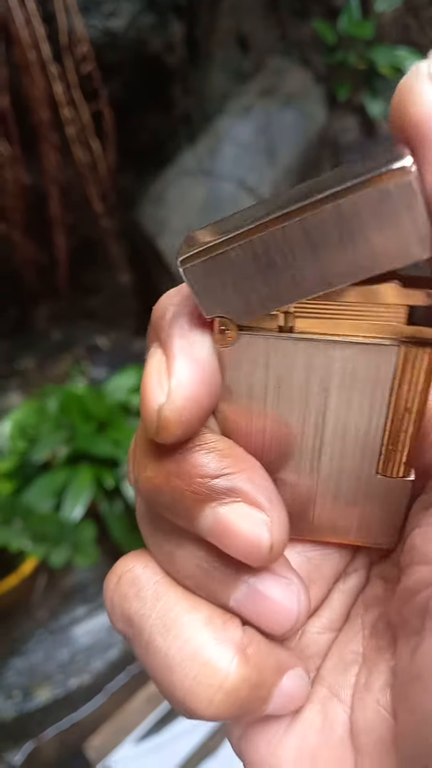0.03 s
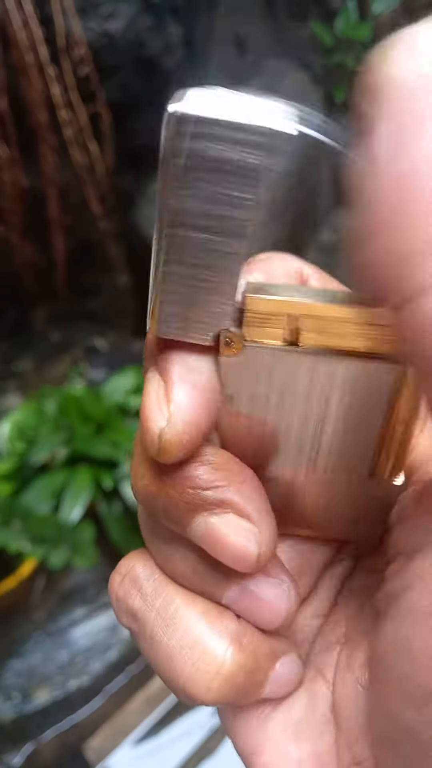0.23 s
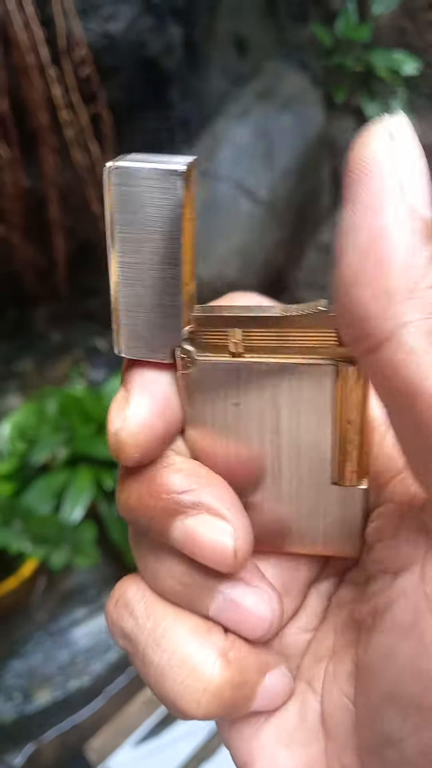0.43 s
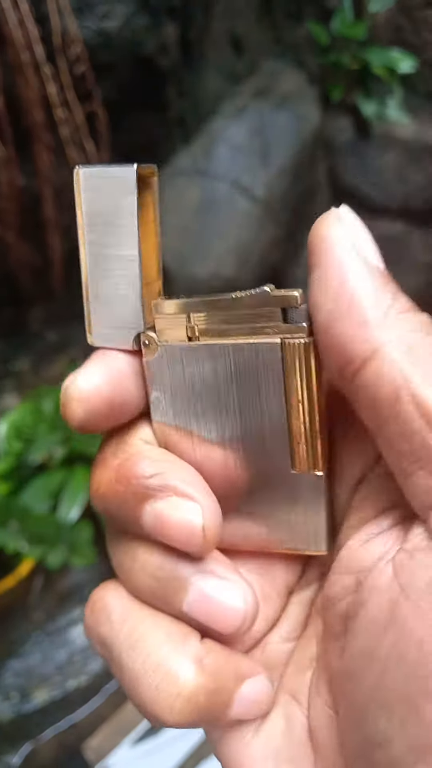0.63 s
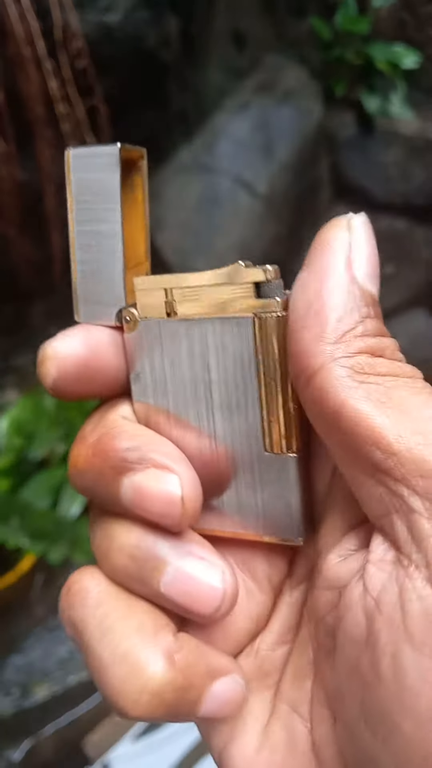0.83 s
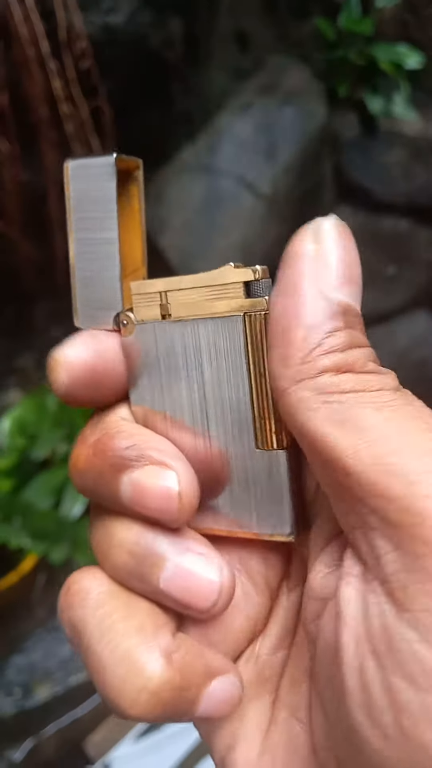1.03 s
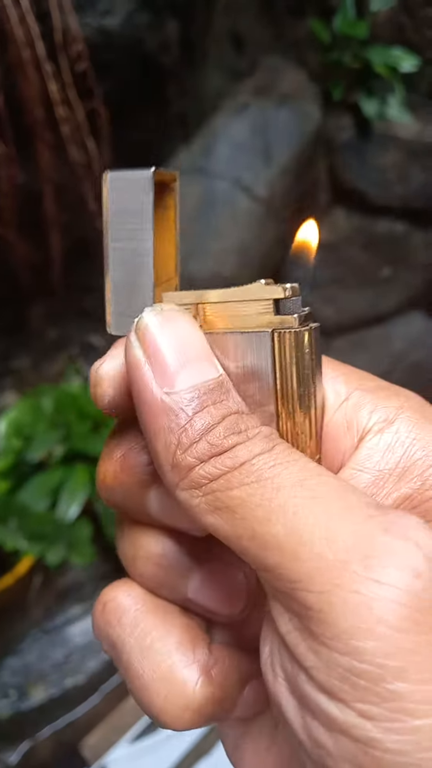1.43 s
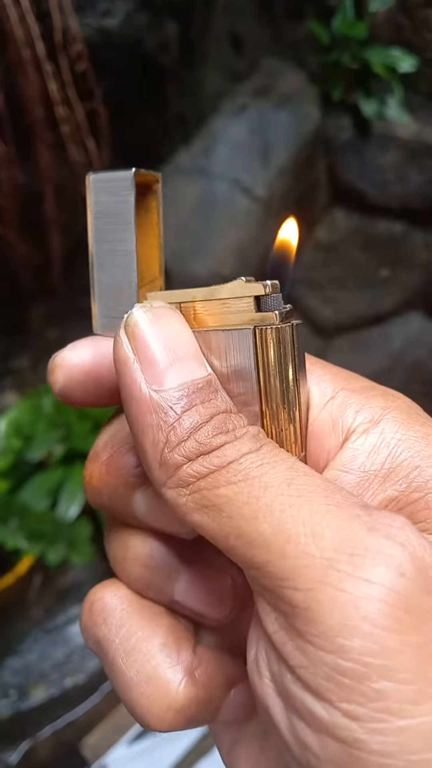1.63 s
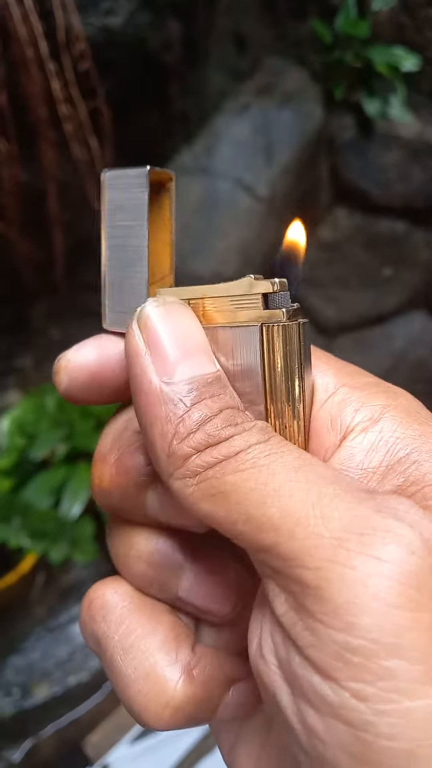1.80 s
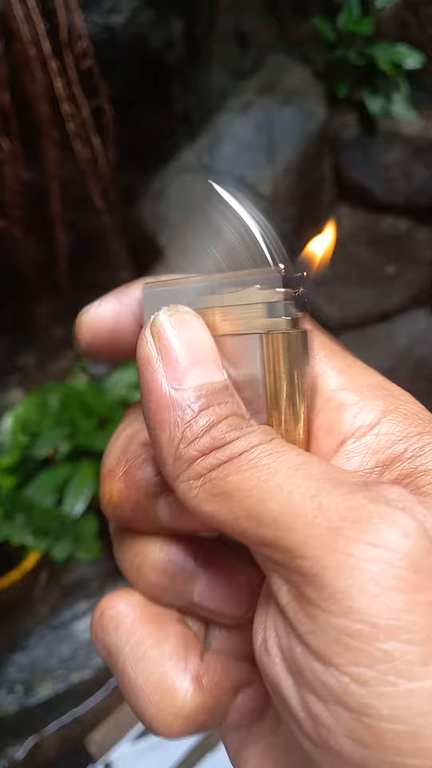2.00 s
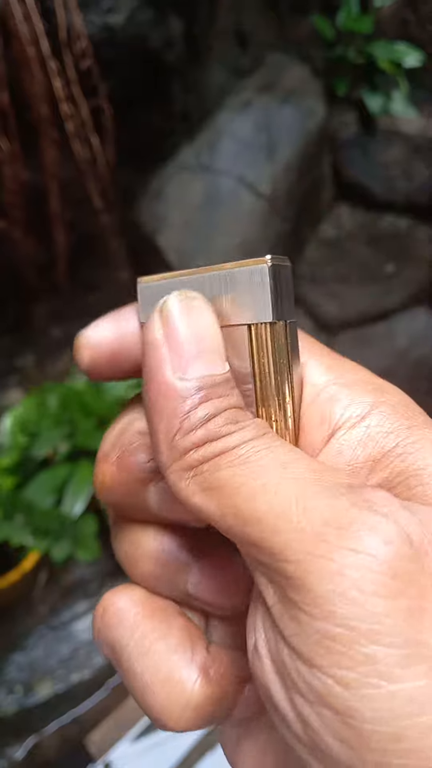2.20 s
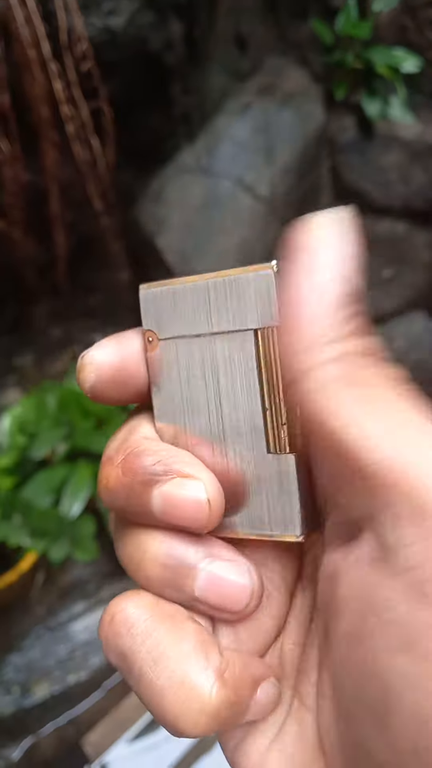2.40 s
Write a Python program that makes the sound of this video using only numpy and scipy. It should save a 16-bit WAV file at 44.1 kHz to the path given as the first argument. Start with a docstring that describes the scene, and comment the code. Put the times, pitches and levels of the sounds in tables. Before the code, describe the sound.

A metal lighter pings open, is struck once, and snaps shut outdoors.

```python
"""A metal lighter in a walled garden, close to a stereo microphone, over a distant rumble and soft air. At 0.2
s the catch lets go and the sprung lid hits its stop with a ping. Fingers brush the case. At 1.1 s the wheel
rasps once across the flint, a small tick ends the stroke, and the gas catches with a puff. From 1.8 s the hinge
squeaks faintly; at 2.0 s the lid snaps shut with a thump in the hand. The stone walls answer the lid, flint and
hinge briefly."""
import sys
import numpy as np
from scipy import signal
from scipy.fft import rfft, irfft, next_fast_len
from scipy.io import wavfile
from scipy.ndimage import uniform_filter1d, map_coordinates

SR = 44100
rng = np.random.default_rng(int(sys.argv[2]) if len(sys.argv) > 2 else 0)


def int16_out(signal):
    """Quantize to a 16-bit WAV file."""
    q = np.round(np.clip(np.atleast_2d(signal).T, -1, 1) * 32767)
    wavfile.write(sys.argv[1], SR, q.astype(np.int16))


N = 112454
TIME_S = np.arange(N) / SR

# the garden's background: time_s, rumble_db, air_db
BACKGROUND_LEVELS = [(0, -40, -51.5), (0.4, -40, -52.5), (0.88, -41.5, -55), (1.05, -43.5, -57.5),
                     (1.22, -37.5, -57), (1.42, -44, -57.5), (1.58, -41, -56.5), (1.85, -42.5, -56),
                     (2.2, -42, -58), (2.55, -40, -60.5)]
# spectra of the distant rumble and the open air: frequency_hz, level_db
RUMBLE_SPECTRUM = [(20, -39.5), (35, -21), (48, -5), (64, -4.5), (82, -10.5), (115, 1.5), (140, 0),
                   (185, -12), (270, -9), (380, -16.5), (600, -17), (900, -38.5), (1500, -68.5)]
AIR_SPECTRUM = [(300, -15), (650, -4.5), (1000, -9), (1300, -15.5), (2000, -16.5), (2700, -22),
                (3500, -28.5), (4400, -36.5), (5900, -41), (8400, -34.5), (12000, -41), (16000, -48)]
# likeness of noise in the left and right channels: frequency_hz, correlation
STEREO_LIKENESS = [(60, 0.87), (150, 0.99), (350, 0.77), (700, -0.18), (1500, 0.089), (8000, -0.34)]
# decay of the walls' answer: frequency_hz, t60_s
WALL_DECAY = [(200, .12), (1500, 0.26), (4000, 0.43), (8000, 0.3296), (12000, .3), (16000, 0.22)]
# tone of the walls' answer: frequency_hz, gain_db
WALL_TONE = [(100, -16), (900, -13.5), (1700, -10), (2800, 2.5), (3800, -7.5), (5500, -2.5), (8000, -1),
             (16000, 0)]
# fingers on the case, and a sharp tick just after the wheel stroke: start_s, level_db, t60_s
CASE_TOUCHES = [(0.455, -66, 0.19), (0.855, -72, 0.16), (1.151, -36, .01), (1.365, -65, 0.37),
                (1.803, -64.5, 0.31), (1.94, -73, 0.52)]
# hinge squeak: time_s, pitch_hz, level_db
HINGE_SQUEAK = [(1.81, 3230, -91.5), (1.84, 3400, -80), (1.888, 3800, -70), (1.92, 3780, -73.5),
                (1.966, 3880, -62), (1.982, 4030, -69), (2.005, 4010, -59.5), (2.015, 4060, -82)]
# stroke of the flint wheel: time_s, level_db
WHEEL_STROKE = [(1.104, -72), (1.109, -62), (1.118, -59.5), (1.124, -39.5), (1.130, -42), (1.136, -28.5),
                (1.140, -41), (1.144, -42), (1.15, -90)]
# resonances of the case under the wheel: pitch_hz, width_hz, gain_db
CASE_RESONANCES = [(3600, 130, -12), (4450, 200, -4), (7520, 73, 10), (9700, 200, -12)]
# spectra of brushing skin and the tick, gas puff and flint rasp: frequency_hz, level_db
TOUCH_SPECTRUM = [(1000, -21), (5500, -16.5), (7300, 1), (10000, 1), (12000, -8), (16000, -13)]
GAS_SPECTRUM = [(1500, -6), (3000, -6), (3700, 2.5), (6400, -10), (7600, 6), (8500, -7), (9600, 3),
                (12000, -5), (16000, -3.5)]
FLINT_SPECTRUM = [(400, -22.5), (1300, -27.5), (1700, -10.5), (2900, -18), (3500, -3), (4300, 0.5),
                  (5800, 0.5), (6400, -8), (7600, -7.5), (8500, -5.5), (9700, -4.5), (11500, -9.5),
                  (15800, -13.5)]
# the lid's four contacts at the microphone: level_db, left_over_right_db, walls_db
CATCH_MIX = (-20, 2.3, -12.5)
OPEN_MIX = (-8, 2.3, -16)
LATCH_MIX = (-42.5, 6, -6.5)
SHUT_MIX = (-7.5, 3, -5.5)
# modes of the lid leaving the catch, open and shut: pitch_hz, level_db, t60_s
CATCH_RING = [(3760, -12, 0.053), (5868, -11, .033), (7950, -14.5, 0.017), (15640, -11, .03)]
OPEN_RING = [(2780, 1, 0.0087), (3690, 0, 0.25), (3688, -23.5, 0.34), (4200, -3.5, .014),
             (4940, -18.5, 0.0067), (6300, -30.5, .03), (7524, -7.5, 0.027), (7565, -40, 0.3),
             (13200, -21.5, .025), (15550, -30, 0.027)]
SHUT_RING = [(200, -3.5, 0.021), (790, -2, 0.0079), (1480, -5, 0.0044), (3786, 1.5, 0.017),
             (3904, 1.5, 0.012), (4890, -17, 0.0069), (7720, -20, .022), (12000, -5, 0.025),
             (13200, -14, 0.0089), (15500, -14, 0.018)]
# spectra of the metal-on-metal cracks: frequency_hz, level_db
CATCH_CRACK = [(300, -40), (2300, -27), (3200, -15), (5500, -11), (6500, -21.5), (7800, -8.5), (9000, -15),
               (9700, -2), (12900, 1), (13900, -20.5), (16000, -8)]
OPEN_CRACK = [(200, -22.5), (1700, -15), (2300, -6.5), (2900, 9), (4300, 0.5), (6500, -10), (9500, -8.5),
              (13400, -5), (16500, -6.5)]
SHUT_CRACK = [(200, -10.5), (900, -1), (1200, -13.5), (1700, -1), (2500, -23), (3300, -11), (3850, 2.5),
              (4400, -1), (5200, 0.5), (6400, -9), (7000, -5), (7650, 3.5), (8500, -4.5), (11700, -4),
              (12250, 3.5), (12800, 8), (14200, -10), (15500, 6), (16500, -15.5)]

CATCH_S, OPEN_S, GAS_S, LATCH_S, SHUT_S = 0.2052, 0.2371, 1.138, 2.0056, 2.0150


def amp(db):
    """Decibels to gain."""
    return 10 ** (np.asarray(db) / 20)


def unit(x):
    """Scale to rms 1."""
    return x / np.sqrt(np.mean(x ** 2) + 1e-20)


def along(points, hz):
    """Read (frequency_hz, value) points on a log frequency axis."""
    knots_hz, values = np.transpose(points)
    return np.interp(np.log(hz + 1), np.log(knots_hz + 1), values)


def curves(rows):
    """One value per sample for each column after the time."""
    times, *columns = np.transpose(rows)
    return [np.interp(TIME_S, times, column) for column in columns]


def wobble(rate_hz):
    """A smooth random curve with rate_hz knots a second."""
    knots = rng.standard_normal(int(N * rate_hz / SR) + 4)
    return map_coordinates(knots, [TIME_S * rate_hz])


def filtered(x, response):
    """Shape x by a gain that depends on frequency."""
    size = next_fast_len(N + SR // 2)
    return irfft(rfft(x, size) * response(np.fft.rfftfreq(size, 1 / SR)), size)[..., :N]


def noise(spectrum):
    """Coloured stereo noise of rms 1, partly alike in the two channels."""
    def mid_side_gains(hz):
        angle = np.arccos(np.clip(along(STEREO_LIKENESS, hz), -1, 1)) / 2
        return amp(along(spectrum, hz)) * [np.cos(angle), np.sin(angle)]
    mid, side = filtered(rng.standard_normal((2, N)), mid_side_gains)
    return unit(np.array([mid + side, mid - side]))


def since(start_s):
    """Seconds since start_s, zero before it."""
    return np.maximum(TIME_S - start_s, 0)


def fade(t, rise_s, t60_s):
    """A quick rise and an exponential decay."""
    return (1 - np.exp(-t / rise_s)) * np.exp(-np.log(1000) * t / t60_s)


def pan(left_over_right_db):
    """Left and right gains for a level difference."""
    return amp(np.array([[1], [-1]]) * left_over_right_db / 2)


def patchy(x, depth_db):
    """Let small patches of time and frequency swell and sink."""
    frames = signal.stft(x, nperseg=2048)[2]
    patches = uniform_filter1d(rng.standard_normal(frames.shape[1:]), size=3, axis=0)
    patches = uniform_filter1d(patches, size=8, axis=1)
    return unit(signal.istft(frames * amp(depth_db * unit(patches)))[1][:, :N])


def background():
    """A restless rumble far off and the soft hiss of open air."""
    rumble_db, air_db = curves(BACKGROUND_LEVELS)
    rumble = amp(rumble_db + 0.42 * wobble(16)) * patchy(noise(RUMBLE_SPECTRUM), depth_db=2.24)
    air = amp(air_db + 0.6 * wobble(8.3)) * patchy(noise(AIR_SPECTRUM), depth_db=2)
    return pan(-0.69) * rumble + pan(-1.5) * air


def walls(x, delay_s=0.006):
    """The stone walls' short diffuse answer, different in each channel."""
    hz, t, frames = signal.stft(rng.standard_normal((2, SR // 2)), SR, nperseg=256)
    decay = np.exp(-np.log(1000) * t / along(WALL_DECAY, hz)[:, None])
    tail = signal.istft(frames * decay, SR)[1]
    delayed = np.pad(x, ((0, 0), (int(delay_s * SR), 0)))
    answer = signal.fftconvolve(delayed, tail / np.linalg.norm(tail[0]), axes=1)[:, :N]
    return filtered(answer, lambda hz: amp(along(WALL_TONE, hz)))


def touches():
    """Skin brushes the case as the grip shifts, and a sharp tick follows the wheel stroke."""
    level = sum(amp(db) * fade(since(start_s), 0.023 * t60_s, t60_s)
                for start_s, db, t60_s in CASE_TOUCHES)
    return level * noise(TOUCH_SPECTRUM)


def hinge():
    """The hinge gives a thin, unsteady, rising squeak as the lid swings."""
    pitch_hz, level_db = curves(HINGE_SQUEAK)
    unsteady_hz = pitch_hz * (1 + 0.016 * wobble(500))
    tone = unit(np.sin(2 * np.pi * np.cumsum(unsteady_hz) / SR))
    swinging = (TIME_S > HINGE_SQUEAK[0][0]) & (TIME_S < HINGE_SQUEAK[-1][0])
    squeak = pan(0.5) * amp(level_db + 2.4 * wobble(80)) * tone * swinging
    return squeak + amp(5) * walls(squeak)


def gas():
    """A short puff as the jet catches fire."""
    return amp(-40.5) * fade(since(GAS_S), rise_s=0.0026, t60_s=0.16) * noise(GAS_SPECTRUM)


def case_response(hz):
    """The metal case rings in a few narrow bands."""
    return sum(amp(db) * 1j * hz * width_hz / (pitch_hz ** 2 - hz ** 2 + 1j * hz * width_hz)
               for pitch_hz, width_hz, db in CASE_RESONANCES)


def flint(chips_per_s=2200, scatter_db=4.5):
    """The wheel tears a dense run of tiny chips from the flint and sets the case ringing."""
    level_db, = curves(WHEEL_STROKE)
    chips = (rng.random(N) < chips_per_s / SR) * rng.choice([-1, 1], N)
    chips = chips * amp(scatter_db * rng.standard_normal((2, N)))
    grit = unit(filtered(chips, lambda hz: amp(along(FLINT_SPECTRUM, hz))))
    rasp = grit + amp(0.5) * noise(FLINT_SPECTRUM)
    turning = (TIME_S > WHEEL_STROKE[0][0]) & (TIME_S < WHEEL_STROKE[-1][0])
    scrape = amp(level_db) * rasp * turning
    scrape += filtered(scrape, case_response)
    return pan(0.91) * scrape + amp(-25) * walls(scrape)


def chatter(start_s, spectrum, level_db, t60_s):
    """Tiny repeated contacts of the lid blur into a dying burst of noise."""
    return amp(level_db) * fade(since(start_s), 0.00081, t60_s) * noise(spectrum)


def contact(start_s, mix, modes, spectrum, rise_s, crack_db, crack_t60_s, crack_walls_db):
    """Metal hits metal: a crack and the lid's ringing modes, heard close up and off the walls."""
    level_db, pan_db, walls_db = mix
    left_lag_s = 0.00003  # the ring reaches the left microphone port later
    t = np.array([since(start_s + left_lag_s), since(start_s)])
    ring = sum(amp(db) * fade(t, rise_s, t60_s) * np.sin(2 * np.pi * hz * t) for hz, db, t60_s in modes)
    crack = amp(crack_db) * fade(t, rise_s, crack_t60_s) * noise(spectrum)
    direct = pan(pan_db) * (ring + crack)
    reflected = amp(walls_db) * walls(ring + amp(crack_walls_db) * crack)
    return amp(level_db) * (direct + reflected)


def hand_thump(start_s, start_hz=85.8, sag_s=0.064):
    """The hand takes the blow with a low thump that sags in pitch."""
    t = since(start_s)
    cycles = start_hz * sag_s * (1 - np.exp(-t / sag_s))
    return pan(5.5) * amp(-8.5) * fade(t, rise_s=0.0042, t60_s=0.066) * np.sin(2 * np.pi * cycles)


def lid_opening(dip_s=0.376, dip_width_s=0.0081, dip_db=-17):
    """The catch slips; the sprung lid hits its stop, chatters on it and rings freely."""
    slip = contact(CATCH_S, CATCH_MIX, CATCH_RING, CATCH_CRACK,
                   rise_s=0.0002, crack_db=4, crack_t60_s=0.006, crack_walls_db=-3)
    ping = contact(OPEN_S, OPEN_MIX, OPEN_RING, OPEN_CRACK,
                   rise_s=0.0006, crack_db=2, crack_t60_s=0.01, crack_walls_db=-4)
    dip = amp(dip_db * np.exp(-((TIME_S - dip_s) / dip_width_s) ** 2))  # the fading ping dips briefly
    rebound = chatter(OPEN_S + 0.0064, OPEN_CRACK, level_db=-25.5, t60_s=0.082)
    return slip + dip * ping + rebound


def lid_closing():
    """The lid brushes the latch, rides over it, slams shut and buzzes against the case."""
    brush = contact(LATCH_S, LATCH_MIX, SHUT_RING, SHUT_CRACK,
                    rise_s=0.0004, crack_db=3, crack_t60_s=0.029, crack_walls_db=4)
    slide = chatter(SHUT_S - 0.0029, SHUT_CRACK, level_db=-37, t60_s=0.036)
    snap = contact(SHUT_S, SHUT_MIX, SHUT_RING, SHUT_CRACK,
                   rise_s=0.0012, crack_db=3, crack_t60_s=0.014, crack_walls_db=5)
    buzz = chatter(SHUT_S + 0.0088, SHUT_CRACK, level_db=-29.5, t60_s=0.12)
    return brush + slide + snap + buzz + hand_thump(SHUT_S + 0.0018)


def scene():
    """The lighter is opened, struck and shut at the microphone, with the garden behind it."""
    return lid_opening() + flint() + gas() + touches() + hinge() + lid_closing() + background()


def record(dry, ceiling=0.95, top_hz=16300, taper_hz=500):
    """The recorder rounds off the highest peaks and cuts the treble at its band limit."""
    rounded = dry / (1 + np.abs(dry / ceiling) ** 8) ** (1 / 8)
    return filtered(rounded, lambda hz: np.clip((top_hz - hz) / taper_hz + 0.5, 0, 1))


dry = scene()
out = record(dry)
int16_out(out)
```